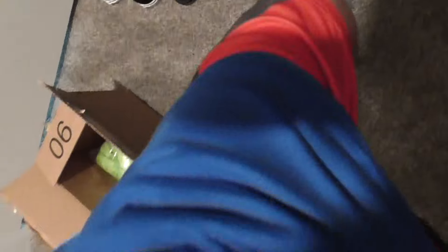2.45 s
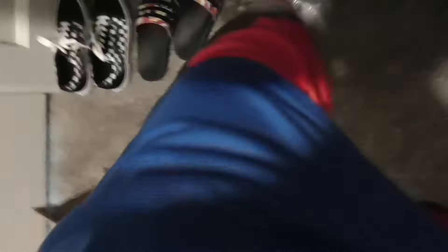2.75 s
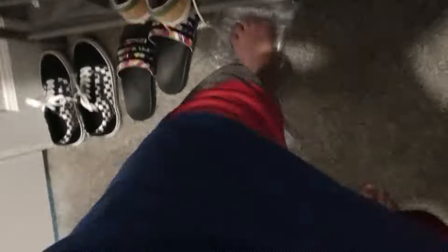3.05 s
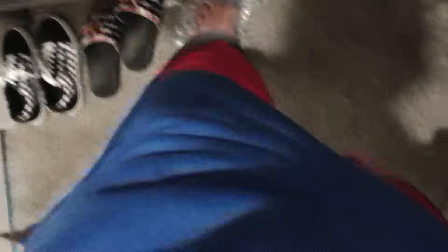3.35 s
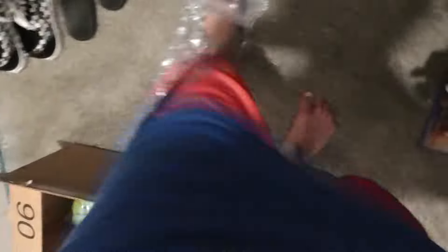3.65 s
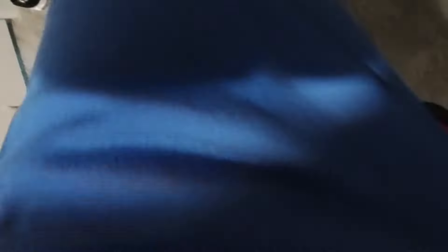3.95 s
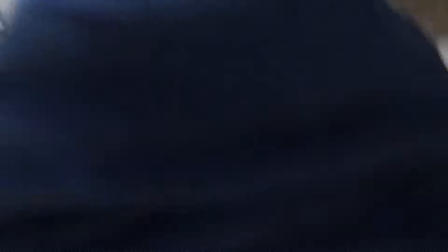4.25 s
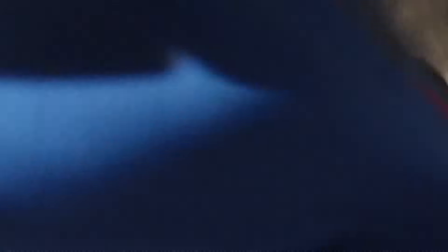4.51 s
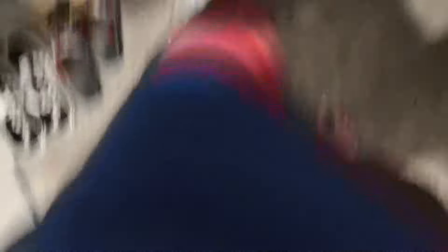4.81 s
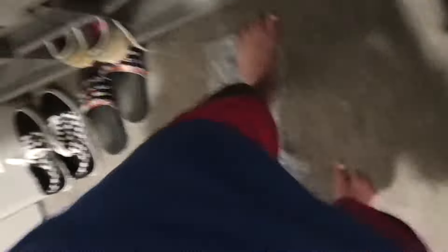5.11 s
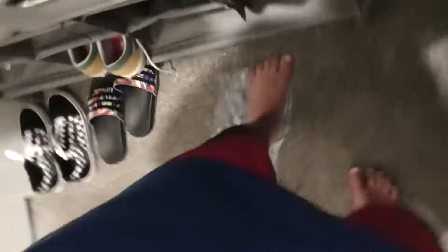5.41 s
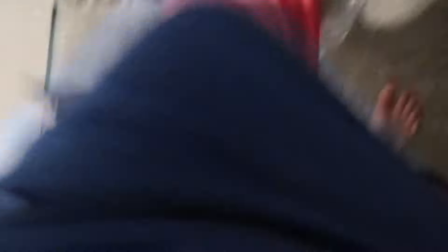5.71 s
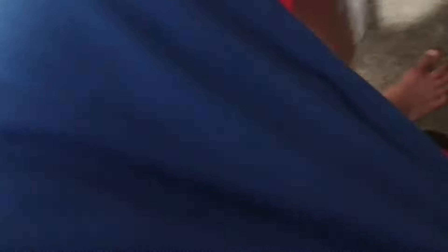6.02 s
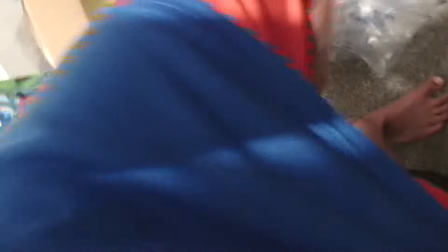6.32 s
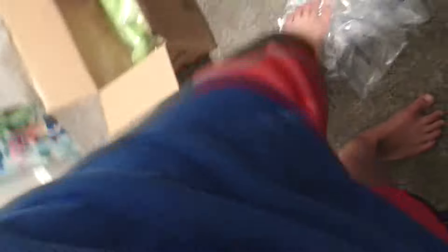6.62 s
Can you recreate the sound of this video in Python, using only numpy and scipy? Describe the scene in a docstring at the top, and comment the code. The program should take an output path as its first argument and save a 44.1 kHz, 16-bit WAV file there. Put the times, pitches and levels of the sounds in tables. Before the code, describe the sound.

A bare foot stomps on plastic air pillows, bursting them in three loud pops with plastic crinkling in between, in a small room.

```python
"""A small carpeted room: a bare foot treads on plastic air pillows, over faint room air, hum and buzz.
The sole hisses on the film; creases flip in tiny snaps that boom in the air-filled pillows.
Three stomps burst pillows: the film tears, the freed air swings and the room rings.
The bangs overload two closely spaced microphone ports, and the gain ducks after them."""
import sys
import numpy as np
from scipy import signal
from scipy.fft import rfft, irfft
from scipy.io import wavfile
from scipy.ndimage import uniform_filter1d

SR = 44100
rng = np.random.default_rng(int(sys.argv[2]) if len(sys.argv) > 2 else 0)


def store_pcm(level_fs):
    """Save levels as 16-bit WAV."""
    pcm = np.round(np.clip(level_fs, -1, 1) * 32767).astype(np.int16)
    wavfile.write(sys.argv[1], SR, np.atleast_2d(pcm).T)


N = 302967
TIME_S = np.arange(N) / SR
FORCE_TIME_S = TIME_S[::40]
RING_TIME_S = np.arange(SR // 2) / SR

# Spectrum of a pillow's boom. Each row: frequency in Hz, relative density in dB.
BOOM_SPECTRUM = [(40, -34.5), (100, -15), (200, -9), (380, -0.5), (520, -2.5), (900, -5.5), (1300, -11),
                 (1800, -27.5), (3000, -65.5)]
# Spectrum of the film's crackle. Each row: frequency in Hz, relative density in dB.
CRACKLE_SPECTRUM = [(600, -9), (1500, -6), (2200, -1), (2700, -4), (3500, 0.5), (4400, 3), (5800, -2.5),
                    (7800, 2.5), (11500, -2.5), (14500, -5.5), (16000, -16)]


def from_db(db):
    """Decibels to gain."""
    return 10 ** (np.asarray(db) / 20)


def unit_rms(x):
    """Scale to unit rms."""
    return x / np.sqrt(np.mean(x ** 2) + 1e-20)


def unit_energy(x):
    """Scale the mean of both channels to unit energy."""
    return x / np.sqrt(np.sum(x.mean(axis=0) ** 2))


def fade(t60_s):
    """Exponential decay from 1."""
    return np.exp(-np.log(1000) * RING_TIME_S / t60_s)


def ring(hz, t60_s):
    """Damped sine, rarefaction first."""
    return -np.sin(2 * np.pi * hz * RING_TIME_S) * fade(t60_s)


def swell(full_s, rise_s, hold_s, fall_s):
    """Force reaches 1 at full_s, holds and dies away; rise and fall times span 20 dB."""
    before_s = np.maximum(full_s - FORCE_TIME_S, 0)
    after_s = np.maximum(FORCE_TIME_S - full_s - hold_s, 0)
    return 10 ** -(before_s / rise_s + after_s / fall_s)


def add(out, start_s, sound):
    """Mix a sound in at start_s."""
    start = round(start_s * SR)
    out[:, start:start + sound.shape[-1]] += sound[..., :N - start]


def convolve(x, response):
    """Causal convolution, as long as x."""
    x = np.atleast_2d(x)
    return signal.oaconvolve(x, np.atleast_2d(response), axes=-1)[:, :x.shape[-1]]


def resonate(x, hz, q):
    """One resonance, unit peak gain."""
    return signal.lfilter(*signal.iirpeak(min(hz, SR / 3), q, fs=SR), x)


def band(x, hz, q):
    """Two equal resonances in series; unit rms out."""
    return unit_rms(resonate(resonate(x, hz, q), hz, q))


def colour(x, spectrum, keep_rms=True, size=4096):
    """Minimum-phase filter; with keep_rms, white noise keeps its level."""
    hz, db = np.transpose(spectrum)
    bin_hz = np.arange(size // 2 + 1) * SR / size
    gain = from_db(np.interp(np.log(bin_hz + 1), np.log(hz), db))
    cepstrum = irfft(np.log(unit_rms(gain) if keep_rms else gain))
    cepstrum[1:size // 2] *= 2
    cepstrum[size // 2 + 1:] = 0
    return convolve(x, irfft(np.exp(rfft(cepstrum))))


def port_noise(count, width_db=0):
    """Noise at the two ports: largely alike, but nearly unrelated in the high treble."""
    # Port difference. Each row: frequency in Hz, side minus mid in dB before width_db.
    side_spectrum = [(40, -8.5), (150, -4.5), (600, -12.5), (1300, -4), (2400, -16), (4400, -14.5),
                     (8000, -1.5), (15000, -1.5)]
    mid, side = rng.standard_normal((2, count))
    return mid + from_db(width_db) * colour(side, side_spectrum, keep_rms=False) * [[1], [-1]]


def ambience(air_db=-66, hum_hz=106.5, hum_q=6):
    """Quiet room air with a wavering low hum."""
    # Room air. Each row: frequency in Hz, relative density in dB.
    air_spectrum = [(25, -22), (60, -5.5), (100, -11), (160, -2), (400, -5), (900, -14.5), (1500, -14.5),
                    (1900, -23), (2700, -17.5), (3200, -24), (6000, -22.5), (9000, -18.5), (13000, -21),
                    (16000, -34.5)]
    # Hum envelope. Each row: time in seconds, level in dB.
    hum_levels = [(0, -65.5), (.4, -66), (.48, -70.5), (6.87, -75)]
    hum_gain = from_db(np.interp(TIME_S, *np.transpose(hum_levels)))
    hum = hum_gain * band(rng.standard_normal(N), hum_hz, hum_q)
    return from_db(air_db) * colour(port_noise(N), air_spectrum) + hum


def mains_buzz(level_db=-82, mains_hz=60, tick_hz=2800):
    """Faint electrical buzz: one tick per mains cycle."""
    ticks = np.diff(np.floor(TIME_S * mains_hz), prepend=0)
    ticks = ticks * from_db(0.5 * rng.standard_normal(N))
    return from_db(level_db) * band(ticks + 1e-18, tick_hz, q=2)


def brush(hiss_hz=11300, q=1.5):
    """Skin sliding on the film gives a thin hiss."""
    # Strokes of the sole. Each row: time of full force, rise, hold and fall in seconds, level in dB.
    strokes = [(0.253, .12, 0.051, 0.16, -65.5), (1.503, 0.31, 0.1, 0.4, -57.5),
               (3.519, .25, 0.17, .2, -44.5), (5.553, 0.077, 0.12, 0.24, -46.5)]
    gain = sum(from_db(db) * swell(*timing_s) for *timing_s, db in strokes)
    return np.interp(TIME_S, FORCE_TIME_S, gain) * band(port_noise(N), hiss_hz, q)


def footwork(touch_db=-14.5, impact_per_s=8000, taut_db=-3.5):
    """Yield each move of the foot as (force curve, crackle dB, boom dB, creases per second)."""
    # The foot lands, then leans. Each row: touch and landing time in seconds, crackle and boom gain
    # at full weight in dB, leaning time in seconds, leaning crackle gain in dB, leaning creases per second.
    stomps = [(1.809, 0.04, -22.5, -21, .045, -25.5, 4000), (2.586, 0.06, -22.5, -19, .24, -36, 2500),
              (4.742, .041, -25, -25.5, 0.26, -49.5, 700), (6.541, 0.063, -34.5, -35, .3, -47, 2500)]
    # The foot shifts, slides or lifts. Each row: time of full force, rise, hold and fall in seconds,
    # crackle and boom gain in dB, creases per second.
    shifts = [(0.752, 0.44, 0.068, 0.78, -75, -66, 3000), (1.363, .22, .02, .08, -74, -58.5, 4000),
              (1.509, .2, 0.18, .3, -64, -65, 16000), (2.213, .07, .013, 0.23, -37, -42, 1800),
              (2.312, 0.085, 0.11, .33, -44, -44, 7000), (3.491, 0.25, .09, 0.18, -38, -39.5, 8000),
              (3.693, 0.13, 0.11, 0.24, -42.5, -46.5, 4000), (4.044, 0.19, .005, .075, -39.5, -38, 2600),
              (4.131, .11, .165, 0.09, -49, -48, 5000), (4.465, .4, .04, 0.32, -58, -54.5, 9000),
              (4.951, 0.033, 0.04, .02, -41, -48.5, 700), (5.115, .015, 0.17, 0.41, -54.5, -54.5, 190),
              (5.53, .075, 0.058, 0.22, -45.5, -49.5, 2000), (5.703, .085, 0.013, 0.13, -41.5, -43.5, 5000),
              (5.928, 0.28, .17, 0.051, -51, -52, 2000), (6.22, .1, 0.013, .32, -53.5, -55.5, 900)]
    for touch_s, landing_s, crackle_db, boom_db, lean_s, lean_db, lean_per_s in stomps:
        full_s = touch_s + landing_s
        weight = from_db(np.interp(FORCE_TIME_S, [touch_s, full_s], [touch_db, 0]))
        impact = weight * swell(touch_s, rise_s=0.013, hold_s=landing_s, fall_s=0.06)
        yield impact, crackle_db, boom_db, impact_per_s
        lean = swell(full_s, rise_s=0.02, hold_s=lean_s, fall_s=0.036)
        yield lean, lean_db, lean_db + taut_db, lean_per_s   # a taut pillow booms less
    for *timing_s, crackle_db, boom_db, per_s in shifts:
        yield swell(*timing_s), crackle_db, boom_db, per_s


def stick_slip(spread_db=0.87, steps_per_s=50):
    """The film grips and slips, so the force wavers."""
    wobble = rng.standard_normal(1000)
    return from_db(spread_db * np.interp(FORCE_TIME_S * steps_per_s, np.arange(len(wobble)), wobble))


def film_response(idle_per_s=63, rate_exponent=0.4):
    """Force makes creases flip louder and faster; overlapping moves add in power."""
    boom_power, crackle_power, rate_per_s = 0, 0, idle_per_s
    for force, crackle_db, boom_db, per_s in footwork():
        boom_power += (force * from_db(boom_db)) ** 2
        crackle_power += (force * from_db(crackle_db)) ** 2
        rate_per_s += per_s * force ** rate_exponent
    grip = stick_slip()
    controls = grip * np.sqrt(boom_power), grip * np.sqrt(crackle_power), rate_per_s
    return [np.interp(TIME_S, FORCE_TIME_S, control) for control in controls]


def snap(t60_s, room_db, room_t60_s, size=6000):
    """One crease flips: a tiny noise burst and its room tail; unit energy."""
    power = fade(t60_s) ** 2 / t60_s + from_db(room_db) ** 2 * fade(room_t60_s) ** 2 / room_t60_s
    return unit_energy(port_noise(size) * np.sqrt(power[:size]))


def ring_film(tick, hz, ring_db, q=4):
    """A tick plus the ring of the film patch around it."""
    patch = resonate(tick, hz, q) * np.sqrt(q * SR / np.pi / hz)   # about the tick's energy
    return tick + from_db(ring_db) * patch


def radiate(boom, crackle, pan_db=0.33):
    """The boom spreads evenly; the crackle comes slightly from the right."""
    pan = from_db([[-pan_db], [pan_db]])
    return colour(boom, BOOM_SPECTRUM) + colour(crackle, CRACKLE_SPECTRUM) * pan


def crinkle(spread_db=6.5, evenness=0.37, rubbing=0.26, sliding_per_s=1800,
            patch_range_hz=(3310, 15000), patches=14):
    """Creases flip at random; each ticks brightly and drums on the air in the pillow."""
    boom_gain, crackle_gain, rate_per_s = film_response()
    flips = (rng.random(N) < rate_per_s / SR) * rng.choice([-1, 1], N)
    flips = flips * from_db(spread_db * np.minimum(rng.exponential(1, N), 4))
    # At high rates the film also slides: a share of the energy is friction on the carpet.
    friction = rubbing * rate_per_s / (rate_per_s + sliding_per_s)
    boom = np.sqrt(friction) * boom_gain * port_noise(N)
    crackle = np.sqrt(friction) * crackle_gain * port_noise(N)
    # The foot feeds in energy steadily, so a big snap relieves its neighbours.
    recent_power = uniform_filter1d(flips ** 2, size=900)
    usual_power = rate_per_s * np.mean(flips ** 2) / np.mean(rate_per_s)
    flips *= np.sqrt((1 - friction) / (evenness * recent_power + (1 - evenness) * usual_power))
    patch_of_flip = rng.integers(0, patches, N)
    for patch, hz in enumerate(np.linspace(*patch_range_hz, patches)):
        patch_flips = flips * (patch_of_flip == patch)
        drum = snap(t60_s=0.022, room_db=-4, room_t60_s=0.16)
        tick = snap(t60_s=0.0014, room_db=-1, room_t60_s=0.034)
        crease = unit_energy(ring_film(tick, hz, ring_db=-6))
        boom += convolve(boom_gain * patch_flips, drum)
        crackle += convolve(crackle_gain * patch_flips, crease)
    return radiate(from_db(0.03) * boom, from_db(-1.5) * crackle)


def large_snaps(crack_boost_db=4, boom_boost_db=20):
    """Long creases buckle at once, ringing the film and booming in the pillow."""
    # Large creases. Each row: start in seconds, crack and boom gain in dB before boost, film ring in Hz.
    creases = [(1.3793, -37.5, -43, 2240), (2.1809, -34, -49, 8550), (2.2215, -16, -36.5, 7460),
               (3.117, -45, -69, 4160), (3.2666, -29, -52.5, 3980), (3.2926, -31.5, -47.5, 10500),
               (3.789, -26, -38, 7600), (4.3306, -36.5, -53, 4000), (4.8947, -26, -54, 9000),
               (4.9087, -27.5, -48.5, 4800), (4.9414, -22, -46, 7170), (4.9487, -23.5, -42.5, 4200),
               (5.239, -34.5, -52, 12000), (5.249, -29.5, -47, 8260), (5.33, -32, -58.5, 1230),
               (5.3443, -29.5, -60, 7700), (5.3913, -22, -41.5, 1246), (5.4327, -36, -75, 10700),
               (5.4862, -35, -56, 7940), (5.546, -20.5, -36, 1290), (6.075, -33.5, -37, 8690),
               (6.3965, -38, -49, 7120), (6.8349, -25.5, -38, 5260)]
    boom, crackle = np.zeros((2, 2, N))
    for start_s, crack_db, boom_db, hz in creases:
        tick = from_db(crack_db + crack_boost_db) * snap(t60_s=0.006, room_db=-4, room_t60_s=0.06)
        drum = from_db(boom_db + boom_boost_db) * snap(t60_s=0.018, room_db=-18.5, room_t60_s=0.03)
        add(crackle, start_s, ring_film(tick, hz, ring_db=-1))
        add(boom, start_s, drum)
    return radiate(boom, crackle)


def knocks(room_db=-17, t60_cycles=9):
    """The foot and a taut pillow thump dully, with a little room."""
    # Soft contacts. Each row: start in seconds, gain in dB, pitch in Hz.
    contacts = [(.483, -39, 794), (0.914, -45.5, 463), (1.293, -42.5, 212), (1.39, -33, 200),
                (1.409, -36, 204), (1.841, -6, 335), (4.782, -4, 439)]
    out = np.zeros((2, N))
    for start_s, db, hz in contacts:
        room = colour(port_noise(len(RING_TIME_S)) * fade(0.053), BOOM_SPECTRUM)
        soft_onset = 1 - np.exp(-RING_TIME_S * hz)
        thump = soft_onset * ring(hz, t60_cycles / hz)
        add(out, start_s, from_db(db) * (thump + from_db(room_db) * room))
    return out


def room_ring(modes):
    """Room modes struck together, each dying at its own rate."""
    return sum(from_db(db) * ring(hz, t60_s) for hz, db, t60_s in modes)


def bursts(early_db=-14, late_db=-44, open_s=0.00063, build_s=0.0019):
    """The film tears with a crack, the freed air swings a few cycles, and the room answers."""
    # Ruptures. Each row: start in seconds, blast gain in dB, ring in Hz, ring t60 in seconds,
    # then crack, room and deep-mode gain in dB.
    ruptures = [(1.8774, 2.5, 298.7, 0.058, -11, 9.5, -52.5), (1.8862, 6, 376, 0.014, -15, 10, -52),
                (2.8633, 0.5, 410, 0.033, -11, 8.5, -45.5), (2.8948, 4, 480.5, 0.028, -16, 7, -27.5),
                (4.991, 5, 524, 0.021, -11.5, 7.5, -34.5)]
    # Swings of the freed air. Each row: multiple of the ring frequency, relative gain in dB.
    air_modes = [(0.604, -10), (0.998, 4.5), (1.58, -2.5), (2.698, -13)]
    # First reflections. Each row: delay in seconds, gain in dB.
    echoes = [(.0085, -22), (0.0209, -16)]
    # Room modes; the deep ones ring longest. Each row: frequency in Hz, relative gain in dB, t60 in seconds.
    room_modes = [(117, -35, 0.26), (177, -39, 0.46), (205.4, -21, 0.17), (302, -19.5, 0.22),
                  (366, -11.5, .13), (437.4, -18.5, 0.15), (496, -26, 0.26), (519, -29, 0.12),
                  (642, -24.5, .14), (700, -28.5, 0.18), (805.4, -26.5, 0.17), (1040, -27.5, 0.057)]
    deep_modes = [(67.5, -1, 0.75), (87, -4, .5), (112.8, -3, 0.85)]
    # Early and late room sound. Each row: frequency in Hz, relative density in dB.
    early_spectrum = [(40, -34.5), (90, -11.5), (180, 2.5), (350, 7), (600, 4), (900, -1.5), (1300, -14.5),
                      (2000, -27), (3500, -34), (8000, -49)]
    late_spectrum = [(40, -18.5), (100, 2.5), (500, -2), (900, -6.5), (1400, -18), (2200, -33)]
    out, count = np.zeros((2, N)), len(RING_TIME_S)
    build = 1 - np.exp(-RING_TIME_S / build_s)   # reflections pile up
    opening = 1 - np.exp(-RING_TIME_S / open_s)
    tear = opening * (fade(0.018) + from_db(-21.5) * fade(0.1))
    ringing, deep = room_ring(room_modes), room_ring(deep_modes)
    for start_s, blast_db, hz, t60_s, crack_db, room_db, deep_db in ruptures:
        blast = opening * sum(from_db(blast_db + db) * ring(ratio * hz, t60_s) for ratio, db in air_modes)
        add(out, start_s, blast)
        for delay_s, echo_db in echoes:
            add(out, start_s + delay_s, from_db(echo_db) * blast)
        early = from_db(early_db) * colour(port_noise(count, width_db=1) * fade(0.13), early_spectrum)
        late = from_db(late_db) * colour(port_noise(count) * fade(0.55), late_spectrum)
        room = from_db(room_db) * (ringing + early + late) + from_db(deep_db) * deep
        crack = from_db(crack_db) * colour(port_noise(count) * tear, CRACKLE_SPECTRUM)
        add(out, start_s, build * room + crack)
    return out


def gain_control(x, threshold_db=-8, depth_db=4, release_db_per_s=22, attack_s=0.033):
    """Automatic gain drops a little after a bang and slowly recovers."""
    peak_db = 20 * np.log10(np.abs(x).max(axis=0) + 1e-9)
    over_db = np.maximum(peak_db - threshold_db, 0)
    release_db = release_db_per_s * TIME_S
    held_db = np.maximum.accumulate(over_db + release_db) - release_db
    pole = np.exp(-1 / (attack_s * SR))
    cut_db = signal.lfilter([1 - pole], [1, -pole], np.minimum(held_db, depth_db))
    return x * from_db(-cut_db)


def scene(low_cut_hz=115):
    """Film, bangs, knocks and background; the bangs and knocks carry little deep bass."""
    film = crinkle() + large_snaps() + brush()
    low_cut = signal.butter(2, low_cut_hz, "high", fs=SR, output="sos")
    blows = signal.sosfilt(low_cut, bursts() + knocks())
    return film + blows + ambience() + mains_buzz()


def record(dry, cutoff_hz=16000):
    """The gain ducks, the bangs flatten against full scale, and the top is cut."""
    ducked = gain_control(dry)
    flattened = ducked / (1 + ducked ** 8) ** (1 / 8)
    high_cut = signal.ellip(10, 0.1, 70, cutoff_hz, fs=SR, output="sos")
    return signal.sosfilt(high_cut, flattened)


dry = scene()
out = record(dry)
store_pcm(out)
```